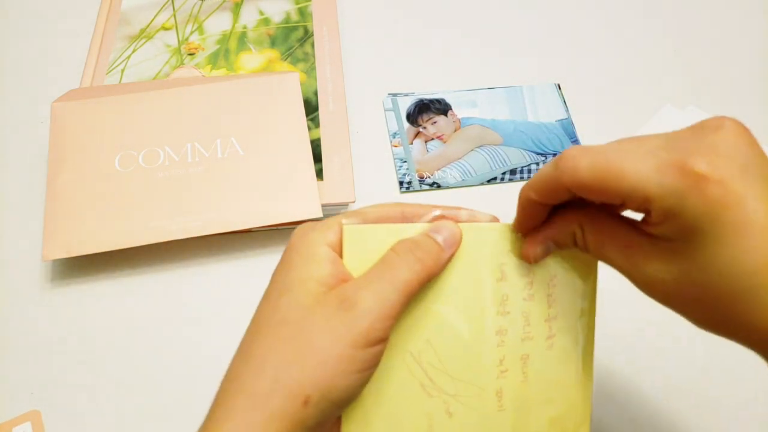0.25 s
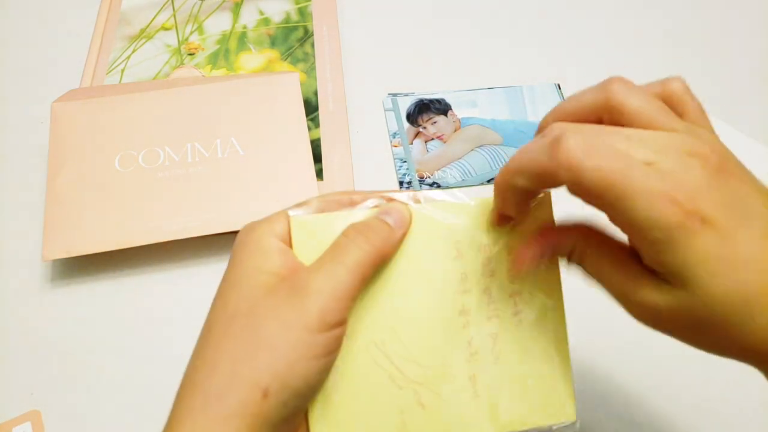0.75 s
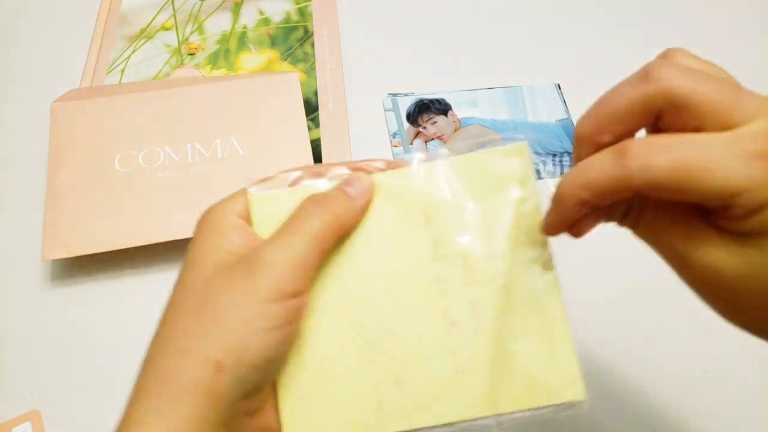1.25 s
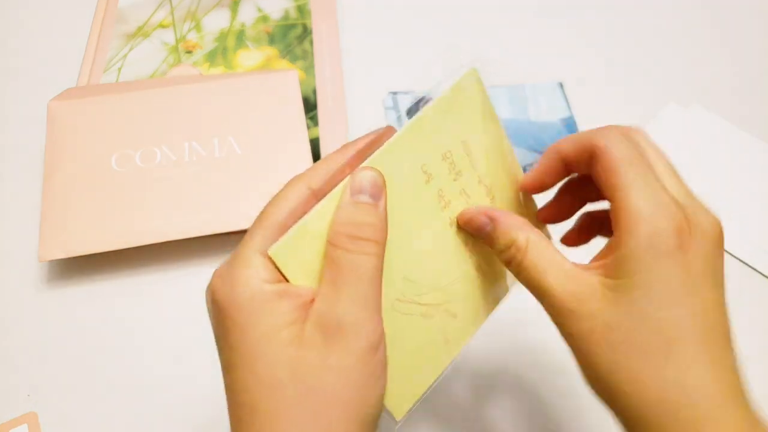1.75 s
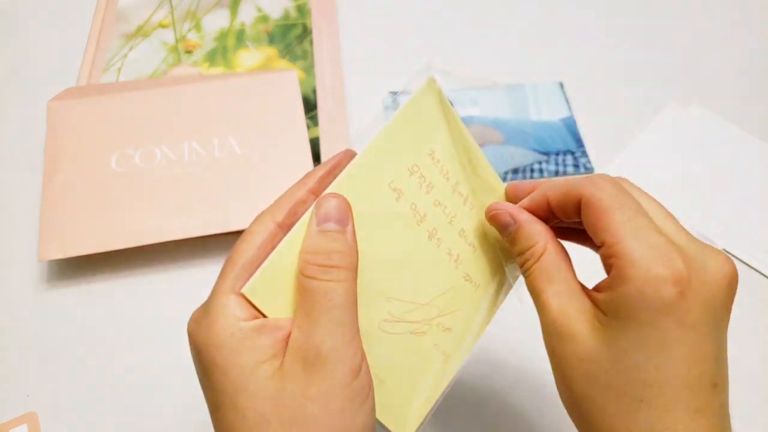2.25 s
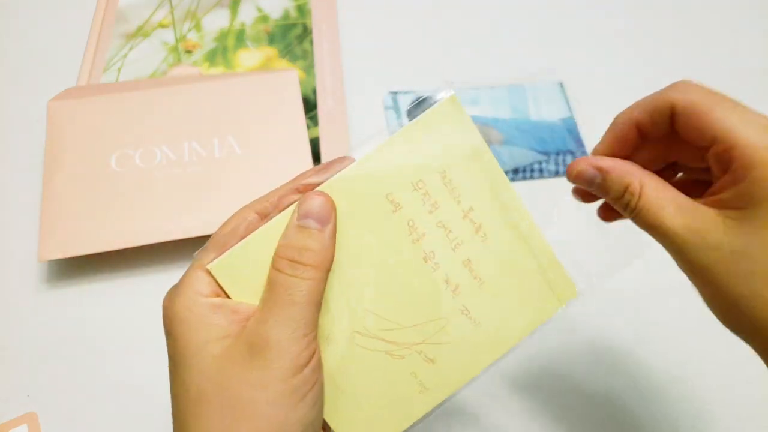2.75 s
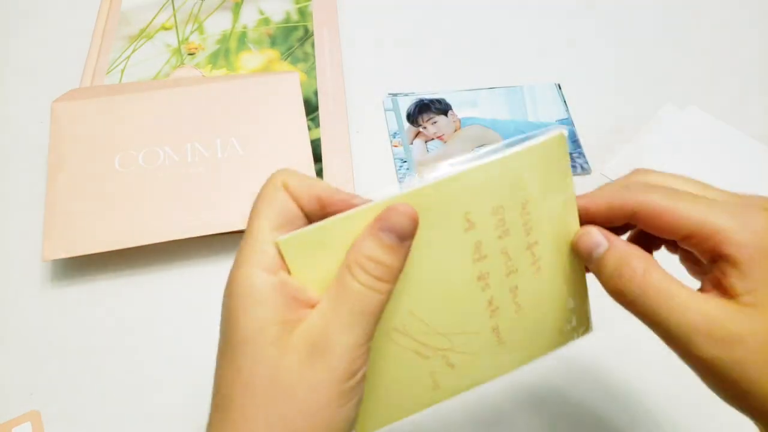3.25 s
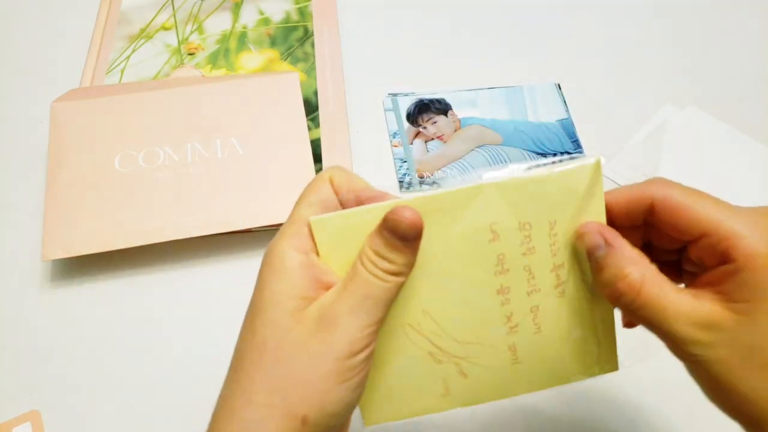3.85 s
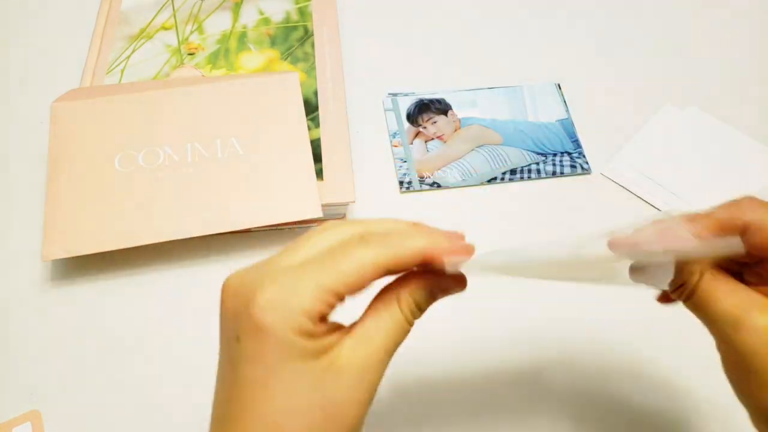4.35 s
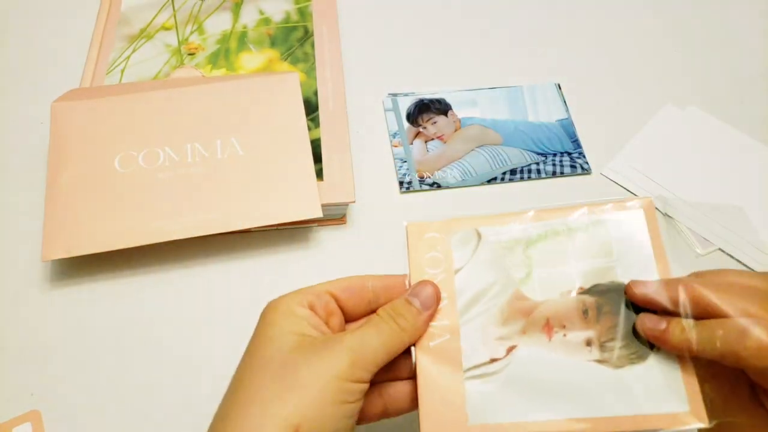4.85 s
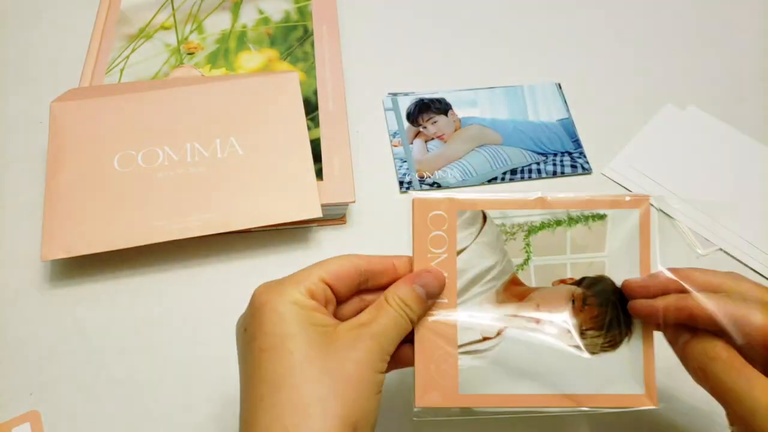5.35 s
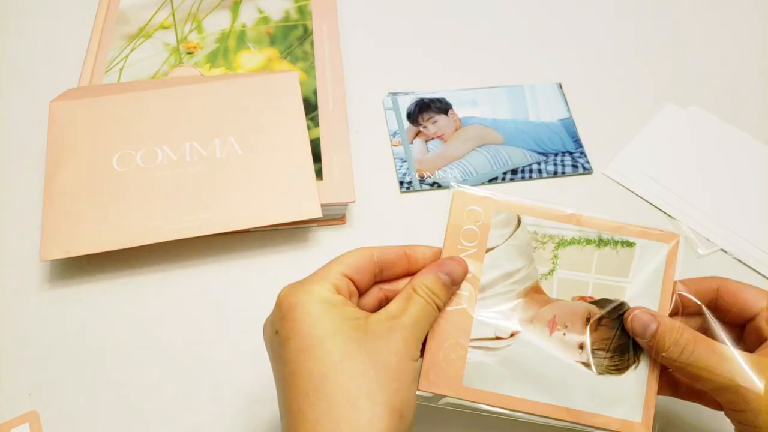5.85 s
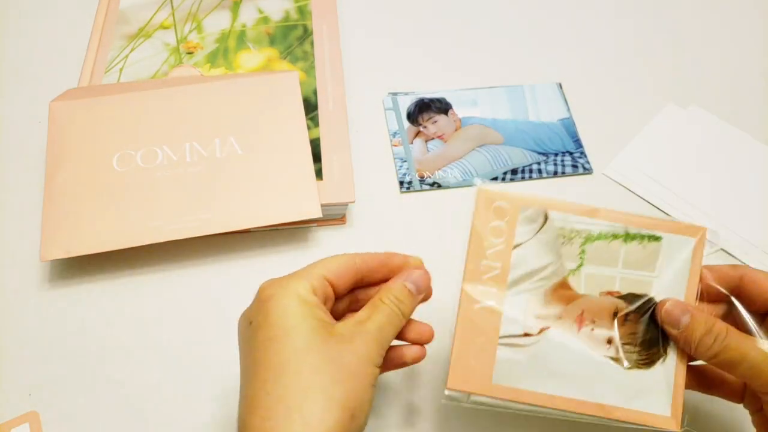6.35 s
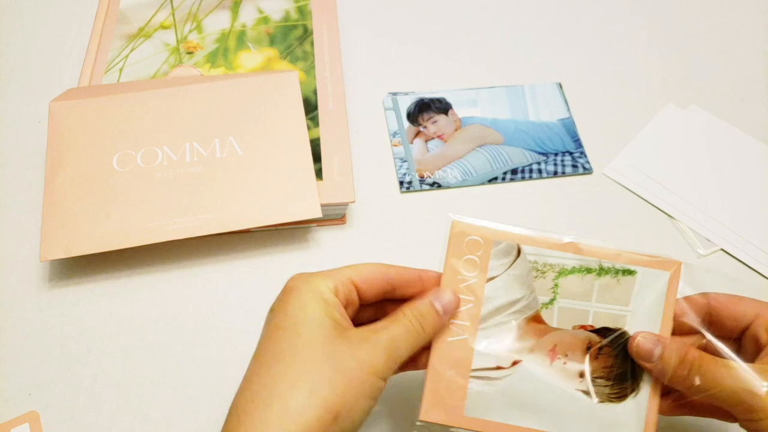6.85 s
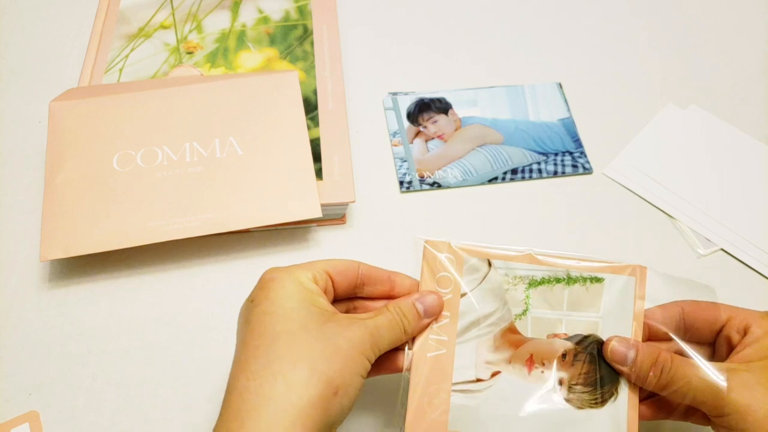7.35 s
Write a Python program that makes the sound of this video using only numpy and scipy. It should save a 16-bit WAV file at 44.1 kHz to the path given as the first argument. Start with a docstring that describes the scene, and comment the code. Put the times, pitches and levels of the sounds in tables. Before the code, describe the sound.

Close, bright crinkling of clear film around a card: loud snapping flurries, sparse small ticks, then a last crackling burst over faint hum and hiss.

```python
"""Close under a microphone with two ports, in a quiet room, hands pick at a thin plastic sleeve around a card.
From the start a far motor hums in tones under hiss, and fingers slide on the film: noise roughened by tiny creases.
Creases then snap over singly and in bursts, each a noise spike with film and card ringing, some in quick runs.
From about 1.2 s low bumps of card and hands ring briefly as decaying sines; the table and room answer
the sleeve throughout with sparse fading echoes. The background sinks after the first loud burst, swelling back later."""
import sys
import numpy as np
from scipy import signal
from scipy.fft import rfft, irfft
from scipy.io import wavfile
from scipy.ndimage import uniform_filter1d

SR = 44100
rng = np.random.default_rng(int(sys.argv[2]) if len(sys.argv) > 2 else 0)


def unload_audio(sound):
    """Save the sound as a 16-bit wav file, at the path given as the first command line argument."""
    columns = np.transpose(np.atleast_2d(sound))
    # keep every value between -1 and 1, then stretch to whole-number steps
    steps = np.round(np.clip(columns, -1, 1) * 32767)
    wavfile.write(sys.argv[1], SR, steps.astype(np.int16))


N = 335951

# Background level over time, for air and tones alike: (time [s], gain [dB])
BACKGROUND_GAIN = [(0, -6), (.42, -1.5), (.6, -10.5), (2.7, -10), (4.4, -9), (5.25, -4), (7.62, -4.5)]
# Spectrum of room air and hiss: (frequency [Hz], relative level [dB])
AIR_SPECTRUM = [(33, -46.5), (48, -11.5), (100, -24.5), (165, -19), (330, -19.5), (480, -19), (600, -32),
                (940, -28.5), (1450, -43.5), (3900, -45.5), (4700, -30.5), (6200, -29.5), (7200, -49),
                (16000, -45)]
# Likeness of the air at the two ports: (frequency [Hz], left-right correlation [0..1])
AIR_LIKENESS = [(30, 0.93), (100, 0.86), (300, .75), (640, 0.72), (1400, 0.12)]
# Tones of the far motor, before the background gain: (multiple of MOTOR_HZ [-], level [dB])
MOTOR_TONES = [(2, -62.5), (4, -58.5), (7, -50), (8, -63)]
# Two more tones, before the background gain: (frequency [Hz], level [dB])
SIDE_TONES = [(339, -69), (388, -65)]
AIR_DB = -50  # before the background gain
MOTOR_HZ = 58.36

# Fingers sliding on the film: (start [s], length [s], crackle level [dB], card relative to film [dB])
FINGER_SLIDES = [(0.039, 0.044, -50.5, -12), (0.261, 0.68, -46.5, -14.5), (1.271, .42, -53, -10.5),
                 (1.913, 0.038, -45, -11), (2.127, 0.63, -58, -4), (2.672, 0.038, -58, -3.5),
                 (2.892, 0.29, -53.5, -5), (3.624, 0.4, -52.5, -4.5), (4.206, 0.32, -54, -13),
                 (5.084, 0.19, -52.5, -21), (5.31, 0.19, -47.5, -4.5), (5.692, 0.039, -40, -9),
                 (6.802, 0.049, -47.5, -5), (7.147, 0.071, -47, -10), (7.319, 0.27, -37.5, -9.5)]
# Colour of the crackle on the film: (frequency [Hz], relative level [dB])
FILM_COLOUR = [(1500, -20), (3000, -1), (5500, 3), (8000, 0.5), (16000, -3)]
RISE_S, FADE_DB_PER_S = 0.011, 144.5
REST_DB = -69.5  # film crackle that lies under all the slides
RUMBLE_DB = -7  # low rumble relative to the card's dull band

# Decay of the table and room: (frequency [Hz], time to fall 60 dB [s])
ROOM_DECAY = [(250, 0.27), (4500, 0.39), (10000, 0.26), (16000, 0.26)]
ROOM_DB = -9

# Single creases snapping over: (time [s], nominal peak [dB], card body relative to film [dB])
CREASE_SNAPS = [(.2059, -21.5, -27), (.2694, -22, -27), (.3214, -13.5, -16.5), (.336, -14.5, -26),
                (.3641, -19.5, -39), (.3997, -7.5, -17), (.4127, -10, -12.5), (.419, -13, -23),
                (.4238, -5.5, -15), (.4332, -11, -22), (.4412, -8, -14.5), (.4469, -3.5, -22),
                (.4515, -7.5, -14), (.8018, -21, -24), (.872, -15, -18), (.9248, -23, -39),
                (.9365, -18, -19.5), (.9675, -22, -18.5), (1.076, -18, -18), (1.0845, -29, -48),
                (1.0948, -36, -21), (1.1055, -26, -13), (1.1411, -7, -18), (1.1924, -4.5, -22),
                (1.1979, -6.5, -16), (1.4427, -27, -2), (1.7454, -28.5, -18), (2.0677, -31, -10),
                (2.0882, -31, -14), (2.164, -55, 12), (2.22, 0, -18.5), (2.2371, -11, -2.5),
                (2.2519, -9.5, -6.5), (2.2671, -30, 1), (2.3471, -27, -8), (2.3714, -1.5, -12),
                (2.4151, -12, -1), (2.4547, -11, -4), (2.472, -19, -8), (2.62, -47.5, 9.5),
                (2.6832, -24.5, -9), (2.7202, -33.5, -2), (2.8078, -38.5, -14), (2.9413, -28, -12.5),
                (3.005, -26, -2), (3.0433, -22.5, -5), (3.3548, -38.5, -14), (3.4513, -35, -10.5),
                (3.7156, -34, -22), (3.7803, -20, -21), (3.8989, -13, -12), (4.4186, -29, -19),
                (4.4473, -34, -8), (4.5493, -19, -20), (5.3018, -18.5, -11.5), (5.4051, -16.5, -12),
                (5.4492, -18.5, -9), (5.6652, -23.5, -17.5), (5.7278, -17, -24), (5.8078, -23.5, -26),
                (6.1762, -15, -22), (6.2299, -19.5, -15.5), (6.8069, -51, 7.5), (6.8306, -23.5, -18),
                (6.839, -29, -8.5), (6.9331, -32.5, -17), (6.9566, -34, -10.5), (7.1307, -26, -21),
                (7.142, -21, -23.5), (7.1736, -23, -20), (7.184, -13, -39), (7.2132, -16, -26),
                (7.3098, -22.5, -26), (7.3241, -17.5, -34), (7.339, -11.5, -21), (7.3525, -16, -27),
                (7.3582, -9.5, -15.5), (7.366, -26.5, -0.5), (7.3907, -11.5, -22), (7.4007, -17.5, -8),
                (7.4162, -16.5, -17), (7.4359, -11.5, -16.5), (7.4462, -8, -17.5), (7.4534, -6.5, -19),
                (7.5318, -35, -14), (7.5499, -16, -13), (7.5565, -24, -21)]
# Creases letting go in succession:
# (start [s], end [s], mean step [s], nominal peak of the first snap [dB], card body relative to film [dB])
CREASE_RUNS = [(0.461, 0.489, 0.0026, -8.5, -22), (0.575, .598, .0026, -6.5, -22),
               (1.1142, 1.134, 0.0029, -4.5, -25.5), (1.1488, 1.176, 0.0025, -5, -23),
               (2.22, 2.226, 0.0022, -10.5, -14.5), (3.641, 3.682, 0.0059, -31, -24),
               (3.877, 3.921, 0.0028, -24.5, -15.5), (4.015, 4.058, 0.013, -34, -17),
               (5.459, 5.492, 0.0086, -28.5, -8), (7.207, 7.232, 0.0051, -19.5, -12.5),
               (7.456, 7.472, 0.0027, -23.5, -12.5)]
# Colour of the snaps as the grip on the sleeve changes:
# (time [s], bright edge relative level [dB], film ring [Hz], card ring [Hz], width of both rings [factor])
GRIP_COLOUR = [(.49, 1, 6400, 1290, 1.5), (.57, -2.5, 6370, 1400, 1.25), (1.2, -4, 5690, 1320, 1.335),
               (2.2, -1, 5510, 1580, 1.58), (3.5, -3, 5490, 1394, 1.73), (7.2, -1.5, 5990, 1296, 1.62),
               (7.36, -2, 3284, 1098, 1.28), (7.44, -3.5, 5540, 1162, 1.34)]
CREST_DB = 10  # nominal peak of a snap over its mean level
RUN_SPREAD_DB = 4  # greatest drop of later snaps in a run
RING_SCATTER = .07  # each crease rings a little apart (spread of log frequency)
THUD_BAND_HZ, BRIGHT_BAND_HZ, BROAD_BAND_HZ = (362, 1230), (6580, 14200), (1500, 6500)
THUD_GAIN, BROAD_DB = 0.68, -7.5  # relative to the card ring; to the film ring

# Low bumps of the card and hands, before the port gains: (time [s], level [dB], frequency [Hz], ring [s])
LOW_BUMPS = [(1.1865, -6.5, 1000, 0.00072), (1.921, -37, 460, 0.015), (2.219, -26.5, 78.5, 0.012),
             (2.412, -31, 159, 0.0055), (3.003, -35, 152, 0.0052), (3.034, -37, 334, 0.01),
             (6.821, -29.5, 179, 0.006), (7.549, -30, 260, 0.0064)]

# Response of the left port, which faces away from the hands: (frequency [Hz], gain [dB])
LEFT_PORT_RESPONSE = [(3000, 0), (9000, -3.5), (13000, -1)]
EDGE_HZ = 16000  # upper band limit


def gain_of(db):
    """Turn decibels into an amplitude factor."""
    return 10 ** (np.asarray(db) / 20)


def evened(x):
    """Scale to a mean level (RMS) of one."""
    return x / np.sqrt(np.mean(x ** 2) + 1e-20)


def read(points, hz):
    """Read a frequency table along a logarithmic axis."""
    table_hz, value = np.transpose(points)
    return np.interp(np.log(hz + 1), np.log(table_hz + 1), value)


def curve(s, value):
    """Draw straight lines between points in time, one value per sample."""
    return np.interp(np.arange(N) / SR, s, value)


def band(x, low_hz, high_hz):
    """Keep one frequency band."""
    sos = signal.butter(2, [low_hz, min(high_hz, 20000)], "band", fs=SR, output="sos")
    return signal.sosfilt(sos, x)


def add(mix, s, sound):
    """Lay a sound into the mix at its time, cut off at the end."""
    part = mix[..., round(s * SR):][..., :sound.shape[-1]]
    part += sound[..., :part.shape[-1]]


def room_air():
    """Room air and microphone hiss: shaped noise, partly alike at the two ports."""
    frames, hz = N // 512 + 5, np.fft.rfftfreq(2048, 1 / SR)
    a, b, c, d = rng.standard_normal((frames, 1025, 4)).T
    same = np.clip(read(AIR_LIKENESS, hz), -1, 1)[:, None]
    left = a + 1j * b
    right = same * left + np.sqrt(1 - same ** 2) * (c + 1j * d)
    spectra = np.array([left, right]) * gain_of(read(AIR_SPECTRUM, hz))[:, None]
    air = signal.istft(spectra, nperseg=2048, noverlap=1536)[1][:, :N]
    return gain_of(AIR_DB) * evened(air)


def far_motor():
    """Multiples of the motor's base tone and two side tones, each wavering slightly in level."""
    t, tones = np.arange(N) / SR, 0
    for tone_hz, db in [(k * MOTOR_HZ, db) for k, db in MOTOR_TONES] + SIDE_TONES:
        waver = evened(uniform_filter1d(rng.standard_normal(N), 4000))
        level = np.sqrt(2) * gain_of(db + 0.4 * waver)
        tones = tones + level * np.sin(2 * np.pi * (tone_hz * t + rng.random()))
    return tones


def background():
    """Air and motor tones rise and sink together."""
    return (room_air() + far_motor()) * gain_of(curve(*np.transpose(BACKGROUND_GAIN)))


def slides():
    """Each slide sets in quickly, holds and dies away: gains of the film and of the card behind it."""
    t, film, card = np.arange(N) / SR, gain_of(REST_DB), 0
    for start, length, db, card_db in FINGER_SLIDES:
        rise = np.clip((t - start) / RISE_S, 0, 1)
        fade_db = FADE_DB_PER_S * np.maximum(t - start - length, 0)
        shape = rise * gain_of(db - fade_db)
        film, card = film + shape, card + shape * gain_of(card_db)
    return film, card


def crackle(per_s=160, spread_db=4.5, smooth=.8):
    """Tiny creases of very uneven size, over the smooth hiss of skin on film."""
    size = gain_of(spread_db * np.minimum(rng.exponential(1, N), 3))
    size = size * (rng.random(N) < per_s / SR)
    # each tiny crease dies away over about a millisecond
    power = signal.lfilter([1], [1, -np.exp(-2 / (.001 * SR))], size ** 2)
    grain = evened(np.sqrt(power)) + smooth
    shared, left, right = rng.standard_normal((3, N))
    drive = (shared + np.array([left, right])) * grain
    colour = gain_of(read(FILM_COLOUR, np.fft.rfftfreq(N, 1 / SR)))
    bright = evened(irfft(rfft(drive) * colour, N))
    rumble = evened(band(left * grain, 38, 350))
    dull = evened(band(shared * grain, 440, 2800)) + gain_of(RUMBLE_DB) * rumble
    film, card = slides()
    return film * bright + card * dull


def room(x):
    """Table and room: sparse taps of random sign, each band dying at its own speed."""
    count = SR // 2
    taps = np.zeros((2, count))
    at = np.arange(220, count - 40, 20)  # the surroundings answer after 5 ms
    at = at + rng.integers(0, 20, (2, len(at)))
    np.put_along_axis(taps, at, rng.choice([-1., 1.], at.shape), 1)
    hz, t, spectra = signal.stft(taps, SR, nperseg=128)
    decay = gain_of(-60 * t / read(ROOM_DECAY, hz)[:, None])
    tail = signal.istft(spectra * decay, SR, nperseg=128)[1]
    return signal.fftconvolve(x, tail / np.linalg.norm(tail[0]), axes=1)[:, :N]


def snaps(rows):
    """Each crease gives a spike and a few milliseconds of flutter in its own colour, partly alike at both ports."""
    out, t = np.zeros((2, N)), np.arange(700) / SR
    shared, left, right = rng.standard_normal((len(rows), 3, 700)).transpose(1, 0, 2)
    apart = np.exp(RING_SCATTER * rng.standard_normal((len(rows), 2)))
    noise = shared[:, None] + .9 * np.stack([left, right], axis=1)
    spike_and_flutter = np.exp(-t / 0.00014) + 0.13 * np.exp(-t / 0.0034)
    bursts = noise * spike_and_flutter * (1 - np.exp(-t / .0001))
    knocks = shared * np.exp(-t / 0.0025)
    thuds = band(knocks, *THUD_BAND_HZ)
    edges, broads = band(bursts, *BRIGHT_BAND_HZ), band(bursts, *BROAD_BAND_HZ)
    times, *colour = np.transpose(GRIP_COLOUR)
    for k, (s, db, body_db) in enumerate(rows):
        edge_db, film_hz, card_hz, width = (np.interp(s, times, c) for c in colour)
        film_hz, card_hz = film_hz * apart[k, 0], card_hz * apart[k, 1]
        card = band(knocks[k], card_hz / width, card_hz * width)
        body = (evened(card) + THUD_GAIN * evened(thuds[k])) * gain_of(body_db)
        ring = band(bursts[k], film_hz / width, film_hz * width)
        film = evened(ring) + gain_of(BROAD_DB) * evened(broads[k])
        # the stronger the bright edge, the weaker the film's middle
        middle = evened(film) * np.sqrt(max(1 - gain_of(2 * edge_db), .05))
        edge = evened(edges[k]) * gain_of(min(edge_db, 0))
        add(out, s, gain_of(db - CREST_DB) * (body + middle + edge))
    return out


def runs():
    """Spreads each run into single snaps at uneven steps and of uneven size."""
    rows = []
    for start, end, step_s, db, body_db in CREASE_RUNS:
        step, drop = rng.random((40, 2)).T
        steps = step_s * (.5 + step)
        drop = drop * (np.arange(40) > 0)  # the first snap is the strongest
        times = start + np.cumsum(steps) - steps[0]
        rows += [(s, db - RUN_SPREAD_DB * d, body_db) for s, d in zip(times, drop) if s < end]
    return rows


def bumps():
    """A soft push of card or hands sets in fast and rings as a decaying sine."""
    out, t = np.zeros(N), np.arange(6000) / SR
    for s, db, hz, ring in LOW_BUMPS:
        shape = (1 - np.exp(-t / 0.00037)) * np.exp(-t / ring)
        add(out, s, gain_of(db) * np.sin(2 * np.pi * hz * t) * shape)
    return out


def scene():
    """Sleeve and room reach the two ports, with the bumps stronger on the left, over the background."""
    sleeve = snaps(list(CREASE_SNAPS)) + snaps(runs()) + crackle()
    left, right = sleeve + gain_of(ROOM_DB) * room(sleeve)
    hz = np.fft.rfftfreq(N, 1 / SR)
    # below 3 kHz the sleeve reaches the right port 0.06 ms first; above, the phase shift stays constant
    later = np.exp(-2j * np.pi * np.minimum(hz, 3000) * .00006)
    left = irfft(rfft(left) * gain_of(read(LEFT_PORT_RESPONSE, hz)) * later, N)
    return np.array([left, right]) + bumps() * gain_of([[3], [-5]]) + background()


def record(dry):
    """Microphone signal: peaks beyond full scale are clipped, then a low-pass sets the band limit."""
    low_pass = signal.firwin(191, EDGE_HZ, window=("kaiser", 7), fs=SR)
    return signal.oaconvolve(np.clip(dry, -1, 1), low_pass[None], "same")


dry = scene()
out = record(dry)
unload_audio(out)
```